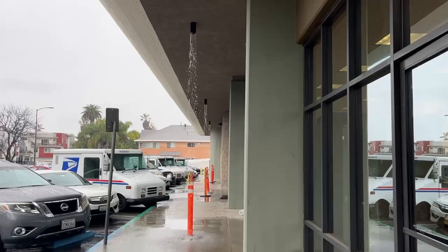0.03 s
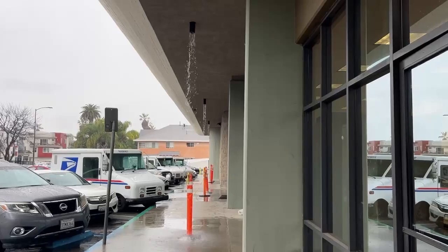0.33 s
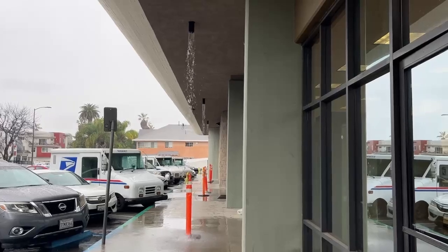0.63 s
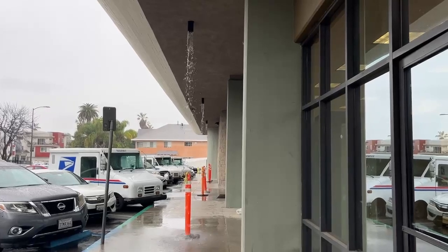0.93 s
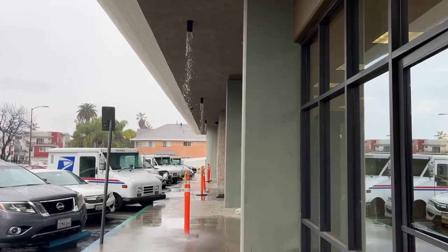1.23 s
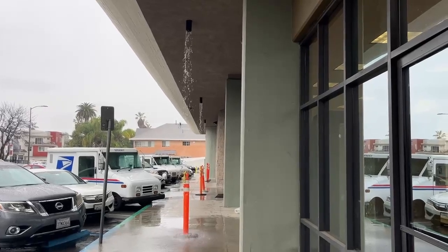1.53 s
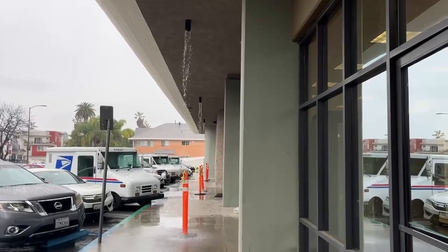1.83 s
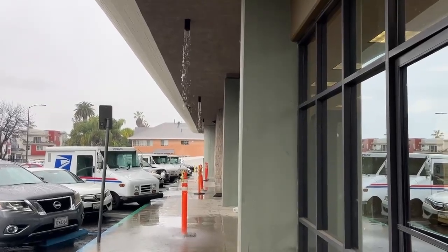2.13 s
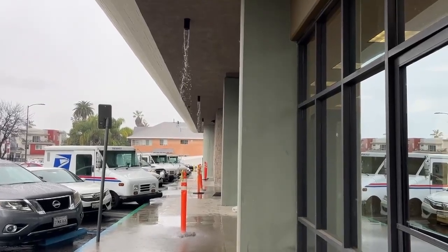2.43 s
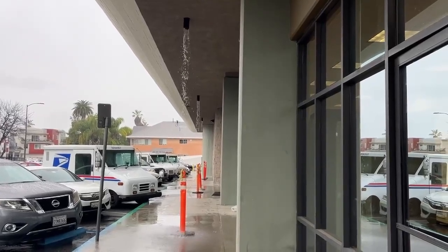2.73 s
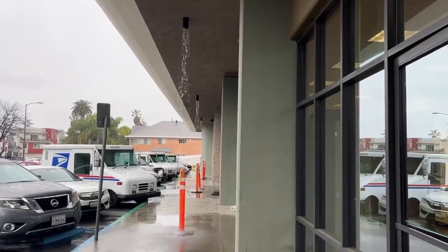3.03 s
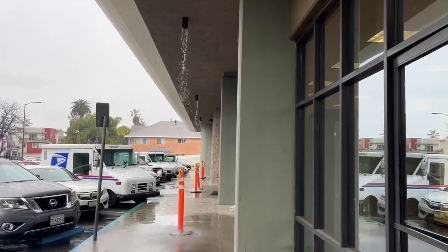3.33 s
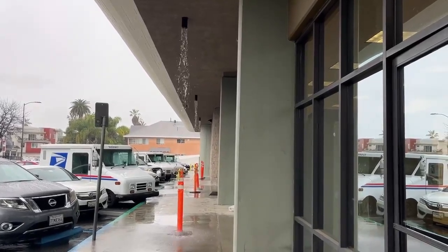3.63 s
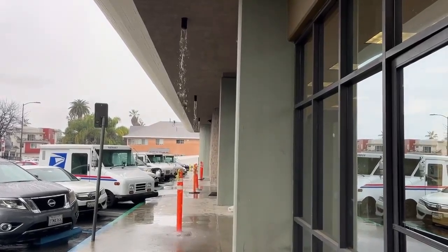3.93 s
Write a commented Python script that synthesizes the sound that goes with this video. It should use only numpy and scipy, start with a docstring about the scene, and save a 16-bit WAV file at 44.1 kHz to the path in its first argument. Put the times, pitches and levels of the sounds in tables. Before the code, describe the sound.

Close by, water spills from a roof spout onto a wet covered walkway, splashing and bubbling throughout, with the hardest slaps near the end. Behind it, street traffic rumbles and a low engine drone rises slightly and fades.

```python
"""Under an overhang, a stereo microphone close to where a roof spout spills rainwater on wet concrete.
From the start, thousands of drops tick on the water film, small bubbles pop and the puddle plops,
while street traffic rumbles further back. Now and then a larger lump slaps down and throws spray.
At about 1.5 s one engine comes forward, slowly picks up speed and fades soon after 3 s.
The hardest slaps land near the end, at 3.7 s."""
import sys
import numpy as np
from scipy import signal
from scipy.fft import rfft, irfft
from scipy.io import wavfile

SR = 44100
rng = np.random.default_rng(int(sys.argv[2]) if len(sys.argv) > 2 else 0)


def master_out(mix):
    """Clip the mix to full scale and print it as 16-bit PCM to the path in sys.argv[1]."""
    frames = np.transpose(np.atleast_2d(mix))
    ceiling = np.clip(frames, -1, 1)
    pcm = np.round(ceiling * 32767).astype(np.int16)
    wavfile.write(sys.argv[1], SR, pcm)


N = 176400


def from_db(db):
    """Decibels to gain."""
    return 10 ** (np.asarray(db) / 20)


def rms_one(x):
    """Scale to unit rms."""
    return x / np.sqrt(np.mean(x ** 2) + 1e-20)


def in_time(rows):
    """Each column of a curve over time, read at every sample."""
    s, *columns = np.transpose(rows)
    return [np.interp(np.arange(N) / SR, s, c) for c in columns]


def per_bin(points):
    """A table over log frequency, read at every FFT bin."""
    hz, value = np.transpose(points)
    return np.interp(np.log(np.arange(N // 2 + 1) * SR / N + 1), np.log(hz), value)


def colour(x, spectrum):
    """Causal filter with the given spectrum; the result has unit rms."""
    cepstrum = irfft(np.log(from_db(per_bin(spectrum))), N)
    response = np.exp(rfft(2 * cepstrum[:N // 2], N))
    return rms_one(irfft(rfft(x) * response, N))


def drift(rate_hz):
    """Slow random motion with spread 1."""
    count = 4096
    hz = np.arange(count // 2 + 1) * SR / N
    slow = rms_one(irfft(rfft(rng.standard_normal(count)) / (1 + (hz / rate_hz) ** 2)))
    return np.interp(np.arange(N) * count / N, np.arange(count), slow)


def impacts(per_s, spread_db):
    """Clicks at random moments: many small, a few large."""
    sizes = from_db(spread_db * np.minimum(rng.exponential(1, N), 5))
    return sizes * rng.choice([-1, 1], N) * (rng.random(N) < per_s / SR)


def widen(mid, side):
    """Two unrelated signals become left and right, wide in some bands and centred in others."""
    # How alike the channels are. Each row: frequency in Hz, likeness from -1 to 1.
    likeness = [(300, 0.89), (600, 0.25), (950, -0.26), (1300, 0.41), (1600, -0.15), (1800, 0.95),
                (2250, 1), (2700, 0.7), (3200, 0.58), (4000, 0.41), (5000, 0.53), (6400, 0.29),
                (7400, -0.73), (8200, 0.15), (9000, -0.066), (9500, 1), (10100, 0.85), (10800, 0.58),
                (12500, .57), (15000, -0.11)]
    # Balance. Each row: frequency in Hz, left minus right in dB.
    balance = [(400, -1.5), (1100, -1), (2000, 0), (2700, -0.5), (3700, 3.5), (5000, 1.4), (7000, 0)]
    # Phase between the channels. Each row: frequency in Hz, lead added to the left in radians.
    lead = [(400, -0.51), (900, 0.83), (1300, -0.54), (2200, 0.16), (3200, 1.5), (4000, -0.39),
            (5000, -0.38), (6000, -0.86), (8500, .3), (9700, 0.28), (10800, 1.1), (13500, -0.95)]
    alike, sign = np.clip(per_bin(likeness), -.99, .99), np.array([[1], [-1]])
    both = np.sqrt((1 + alike) / 2) * rfft(mid) + sign * np.sqrt((1 - alike) / 2) * rfft(side)
    return irfft(both * from_db(sign * per_bin(balance) / 2) * np.exp(.5j * sign * per_bin(lead)), N)


def traffic():
    """The street behind: a low rumble near the centre and the wider wash of tyres on the wet road."""
    # Colours of rumble and tyres. Each row: frequency in Hz, relative density in dB.
    rumble_colour = [(20, -16), (34, -14.5), (41, -1), (52, -0.5), (66, -2.5), (80, 0), (98, -6.5),
                     (114, -4), (128, 2), (148, -1.5), (170, -5.5), (190, -8.5), (250, -13.5), (330, -22),
                     (450, -27.5), (800, -34.5), (2000, -46.5)]
    tyre_colour = [(120, -16.5), (220, 6.5), (300, 4.5), (450, -3), (800, -4.5), (1500, -11), (4000, -21)]
    # How each swells. Each row: time in seconds, relative level in dB.
    rumble_level = [(0.17, -31), (1.33, -32), (2.24, -33), (2.29, -35), (2.65, -34.5), (2.99, -31.5),
                    (3.55, -34), (3.8, -29), (4.0, -33)]
    tyre_level = [(.15, -63), (1.2, -48.5), (2.2, -44), (3.0, -43.5), (4, -43.5)]
    # Stereo width of the rumble. Each row: frequency in Hz, side minus mid in dB.
    rumble_width = [(50, -27), (75, -21), (130, -16), (220, -13.5)]
    (rumble_db,), (tyre_db,) = in_time(rumble_level), in_time(tyre_level)
    mid, side = colour(rng.standard_normal((2, N)), rumble_colour)
    rumble = mid + irfft(rfft(side) * from_db(per_bin(rumble_width)), N) * [[1], [-1]]
    tyres = widen(*colour(rng.standard_normal((2, N)), tyre_colour))
    return from_db(rumble_db + 1) * rumble + from_db(tyre_db) * tyres


def boom():
    """A narrow low boom comes and goes in the traffic, with a wavering hum inside it."""
    # Colour of the boom. Each row: frequency in Hz, relative density in dB.
    boom_colour = [(80, -66), (125, -36.5), (150, -2), (174, 1.5), (205, -30), (400, -78.5)]
    # How boom and hum swell. Each row: time in seconds, level in dB.
    boom_level = [(.2, -37.5), (.68, -35.5), (.9, -45), (1.8, -46.5), (2.2, -30.5), (2.35, -48), (3.0, -36),
                  (4, -64)]
    hum_level = [(0.2, -42), (0.65, -40), (1.4, -49), (2.0, -37), (2.3, -57.5)]
    hum_hz, waver_hz, waver_db = 149.1, 1.34, 2.5
    (boom_db,), (hum_db,) = in_time(boom_level), in_time(hum_level)
    phase = 2 * np.pi * np.cumsum(hum_hz + waver_hz * drift(rate_hz=2.2)) / SR
    hum = from_db(hum_db + waver_db * drift(rate_hz=3.2)) * np.sqrt(2) * np.sin(phase)
    return from_db(boom_db) * colour(rng.standard_normal(N), boom_colour) + hum


def engine():
    """One exhaust drones out in the street, its pitch rising slowly with the firing rate."""
    # The engine's run. Each row: time in seconds, firing rate in Hz, relative level in dB.
    run = [(1.25, 61, -44), (1.55, 62.8, -29), (1.75, 64.9, -35.5), (2.05, 67.8, -30.5),
           (2.3, 69.86, -29.5), (2.68, 72.5, -32), (2.85, 72.2, -42), (3.02, 72.9, -35), (3.3, 73.5, -56)]
    # Exhaust harmonics. Each row: multiple of the firing rate, gain in dB.
    orders = [(1, -2.5), (2, -31)]
    hz, db = in_time(run)
    phase = 2 * np.pi * np.cumsum(hz) / SR
    return from_db(db) * np.sqrt(2) * sum(from_db(gain_db) * np.sin(k * phase) for k, gain_db in orders)


def overhang(x):
    """Reflections off soffit, pillars and glass front shift between two patterns as the stream wanders."""
    t60_s, first_echo_s, wander_radians = 0.21, 0.0065, 1.15
    t = np.arange(SR // 2) / SR
    tails = rng.standard_normal((2, len(t))) * (t > first_echo_s) * np.exp(-np.log(1000) * t / t60_s)
    here, there = (signal.fftconvolve(x, tail / np.sqrt(np.sum(tail ** 2)))[:N] for tail in tails)
    angle = wander_radians * drift(rate_hz=2.78)
    return np.cos(angle) * here + np.sin(angle) * there


def bubbles():
    """Small bubbles pop in the film, each ringing upward from its own pitch."""
    per_s, low_hz, high_hz, spread_db = 170, 1273, 7110, 3
    ring_cycles, chirp = 48, 0.11
    out, t = np.zeros(N + SR), np.arange(SR // 40) / SR
    draws = rng.random((4000, 4))
    starts_s = np.cumsum(-np.log(1 - draws[:, 0])) / per_s
    for s, (_, pitch, size, sign) in zip(starts_s, draws):
        at = int(s * SR)
        if at < N:
            hz = low_hz * (high_hz / low_hz) ** pitch
            life = hz * t / ring_cycles   # 1 when the ring is 60 dB down
            gain = np.sign(sign - .5) * hz ** 1.01 * from_db(spread_db * min(-np.log(1 - size), 4))
            ring = np.sin(2 * np.pi * hz * t * (1 + chirp * life))
            out[at:at + len(t)] += gain * np.exp(-np.log(1000) * life) * ring
    return rms_one(out[:N])


def patchy(x, swell_db):
    """The colour of the splatter shifts as the stream wanders: each octave swells on its own."""
    hz, spectrum = np.arange(N // 2 + 1) * SR / N, rfft(x)
    octave = np.clip(np.log2((hz + 1) / 1000), 0, 4)
    bands = (irfft(spectrum * np.maximum(1 - abs(octave - k), 0), N) for k in range(5))
    return sum(band * from_db(swell_db * drift(rate_hz=40)) for band in bands)


def splash(clumps_db):
    """Drop ticks, fine spray, bubbles and hollow plops, all swelling with the arriving water."""
    # Water landing on the film and in the puddle. Each row: time in seconds, relative level in dB.
    flow = [(0.16, -37), (0.61, -38), (0.65, -34.5), (0.72, -38.5), (0.78, -36), (0.82, -40.5), (1.07, -37),
            (1.17, -39.5), (1.28, -37.5), (1.46, -39.5), (1.55, -37), (1.6, -37), (1.74, -37.5),
            (1.79, -40.5), (1.87, -36.5), (2.03, -39), (2.15, -37), (2.37, -39), (2.41, -37.5), (2.72, -38),
            (2.75, -37.5), (2.81, -40), (2.9, -36.5), (2.94, -38.5), (3.4, -37.5), (3.56, -38.5),
            (3.61, -36), (3.68, -38), (4.0, -38)]
    puddle = [(0.17, -45), (0.6, -48.5), (0.65, -43.5), (0.79, -48), (2.11, -47.5), (2.14, -40),
              (2.27, -49.5), (2.74, -43), (2.8, -44.5), (2.89, -43), (4.0, -44.5)]
    # Colours of the bright ticking splatter and the darker plops; a narrow dip near 7.7 kHz runs through the
    # sound. Each row: frequency in Hz, relative density in dB.
    splatter_colour = [(500, -25.5), (1000, -12), (1600, -13.5), (2100, -4), (2700, 0), (4200, 0.45),
                       (5500, -0.5), (7000, -0.5), (7700, -5), (8400, -2.5), (10000, -4), (12500, -6),
                       (14000, -10.5), (15500, -12)]
    plop_colour = [(200, -6), (400, 0.5), (650, 0.5), (900, 0.5), (1100, 1.5), (1300, 6), (1650, -0.5),
                   (2100, -5), (3200, -19.5)]
    (flow_db,), (puddle_db,) = in_time(flow), in_time(puddle)
    drops = from_db(2) * colour(impacts(per_s=5200, spread_db=2.5), splatter_colour)
    mist = from_db(-4.5) * colour(rng.standard_normal(N), splatter_colour)
    plops = from_db(puddle_db) * colour(impacts(per_s=1300, spread_db=2.5), plop_colour)
    film = patchy(drops + mist, swell_db=1.5) + from_db(-5.5) * bubbles()
    return from_db(clumps_db) * (from_db(flow_db) * film + plops)


def sloshes():
    """Each lump of water bursts into a shower of ticks whose ring sinks as the water spreads."""
    # Lumps landing. Each row: start in seconds, length in seconds, level in dB, midway pitch in Hz.
    lumps = [(0.278, 0.035, -33.5, 2940), (0.62, .12, -36.5, 2300), (0.939, 0.085, -39.5, 2100),
             (1.035, 0.059, -37, 3860), (1.182, 0.1, -36.5, 10100), (1.525, 0.055, -35.5, 5000),
             (2.033, 0.2, -43.5, 2600), (2.388, 0.15, -37.5, 4040), (2.411, 0.037, -34.5, 2340),
             (2.508, 0.024, -41, 1900), (2.735, 0.029, -34, 2400), (2.872, 0.065, -36, 3700),
             (3.116, 0.06, -38.5, 2100), (3.318, .07, -40.5, 2720), (3.639, 0.05, -39, 2075),
             (3.688, 0.013, -30, 10400), (3.738, 0.034, -30.5, 4000), (3.764, 0.056, -34, 2710)]
    rise_s, fall_octaves, sharpness = 0.0043, 0.48, 2.13
    out, ticks = np.zeros(N + SR), np.tile(impacts(per_s=1400, spread_db=1), 2)
    for s, length, db, hz in lumps:
        t, at = np.arange(int(length * SR)) / SR, int(s * SR)
        ring_hz = hz * 2 ** (fall_octaves * (.5 - t / length))
        carrier = np.exp(2j * np.pi * np.cumsum(ring_hz) / SR)
        pole = np.exp(-2 * np.pi * hz / sharpness / SR)
        # Shift down, low-pass, shift back: a resonance that follows the sinking pitch.
        smoothed = signal.lfilter([1], [1, -2 * pole, pole * pole], ticks[at:at + len(t)] / carrier)
        shower = (carrier * smoothed).real
        envelope = np.minimum(t / rise_s, 1) * np.cos(np.pi / 2 * t / length)
        out[at:at + len(t)] += from_db(db) * rms_one(shower) * envelope
    return out[:N]


def slaps():
    """Each heavy drop smacks the water film: a burst of a few cycles that sinks in pitch."""
    # Heavy drops. Each row: start in seconds, peak level in dB, pitch at the peak in Hz.
    heavy_drops = [(0.292, -31, 2410), (0.633, -23, 2980), (1.062, -23, 4160), (1.2797, -25, 3200),
                   (1.5386, -19, 5300), (1.5516, -17, 5300), (2.1268, -23, 3500), (2.2701, -24, 2608),
                   (2.384, -16.5, 3980), (2.4857, -20, 5010), (2.511, -24.5, 1880), (2.7422, -26, 1834),
                   (2.826, -23, 2720), (2.8955, -20, 5500), (3.1144, -23, 2320), (3.7309, -11.5, 4300),
                   (3.7408, -15, 4200), (3.7552, -20, 5840), (3.8865, -20, 4970)]
    rise_cycles, pitch_fall = 1.1, 0.05
    out, t = np.zeros(N + SR), np.arange(SR // 100) / SR
    for s, db, hz in heavy_drops:
        at = int(s * SR)
        life = hz * t / rise_cycles   # 1 at the peak
        phase = 2 * np.pi * np.cumsum(hz * np.exp(pitch_fall * (1 - life))) / SR
        out[at:at + len(t)] += from_db(db) * life * np.exp(1 - life) * np.sin(phase)
    return out[:N]


def falling_water():
    """The stream breaks up on the walkway: splash, sloshes and slaps, with their reflections."""
    clumps_db = 1.1 * drift(rate_hz=34.2)   # the water arrives unevenly
    mid = splash(clumps_db) + sloshes() + slaps()
    side = splash(clumps_db) + sloshes()
    reflected = from_db(-1.5)
    return widen(mid + reflected * overhang(side), side + reflected * overhang(mid))


def scene():
    """Water close in front, street behind."""
    return falling_water() + traffic() + boom() + engine()


def record(dry):
    """The sound cuts in after a moment of silence; a steep low-pass takes off the highest treble."""
    start_s, stopband_hz = .151, 16300
    opened = dry * np.where(np.arange(N) / SR >= start_s, 1, 1e-5)
    return signal.sosfiltfilt(signal.cheby2(14, 50, stopband_hz, fs=SR, output="sos"), opened)


dry = scene()
out = record(dry)
master_out(out)
```